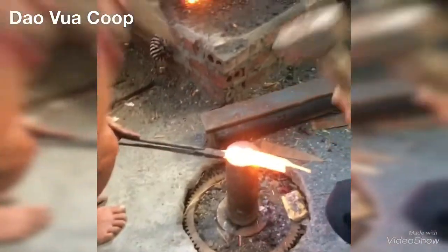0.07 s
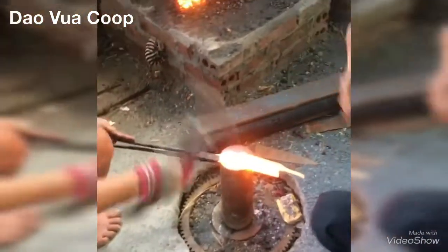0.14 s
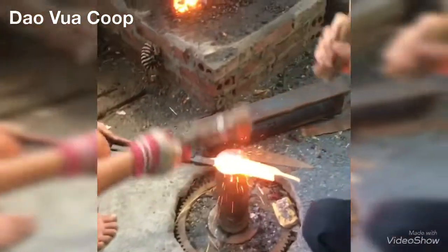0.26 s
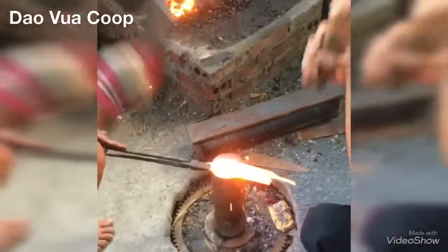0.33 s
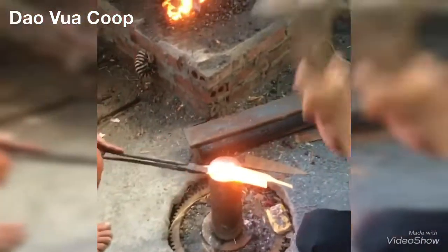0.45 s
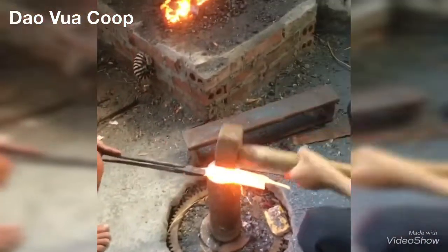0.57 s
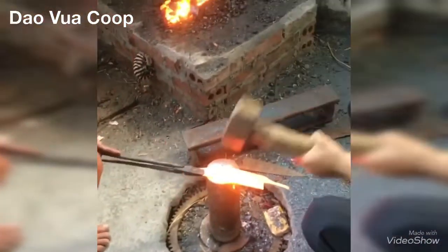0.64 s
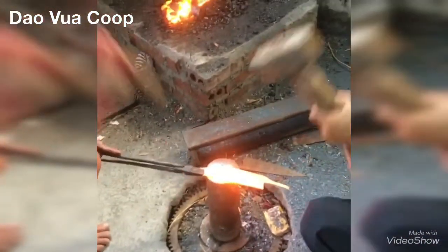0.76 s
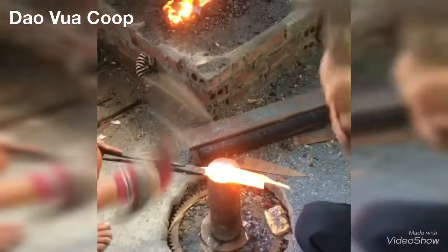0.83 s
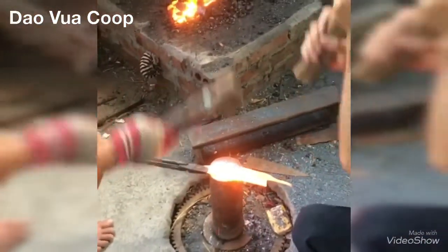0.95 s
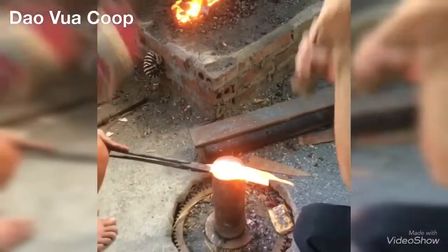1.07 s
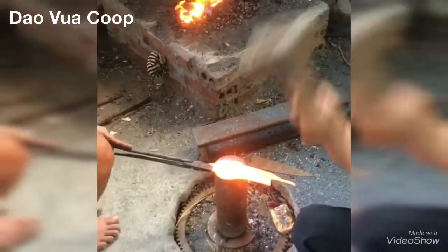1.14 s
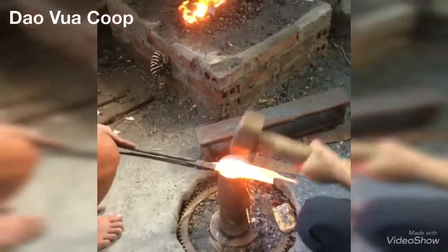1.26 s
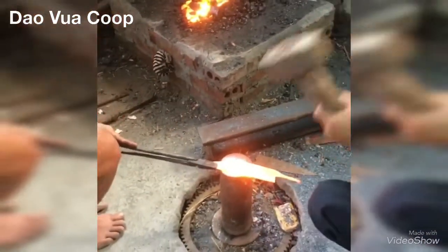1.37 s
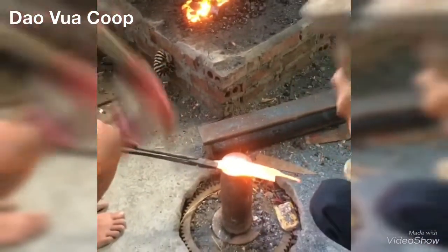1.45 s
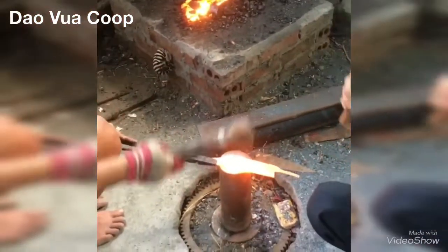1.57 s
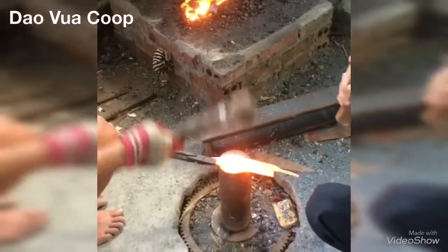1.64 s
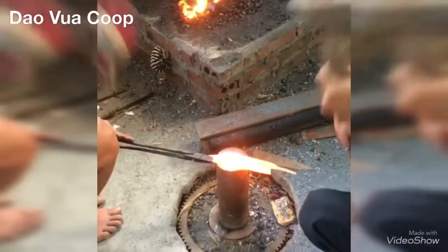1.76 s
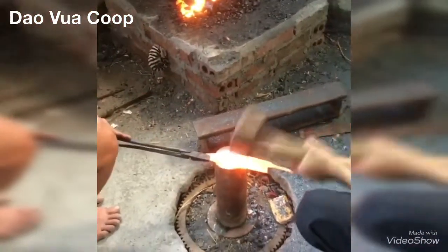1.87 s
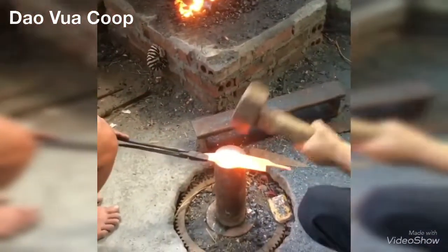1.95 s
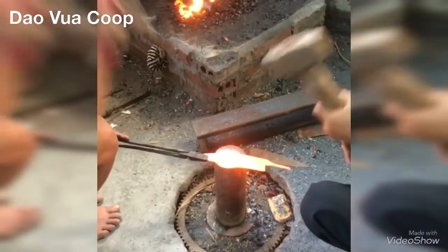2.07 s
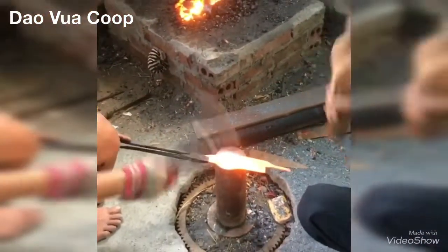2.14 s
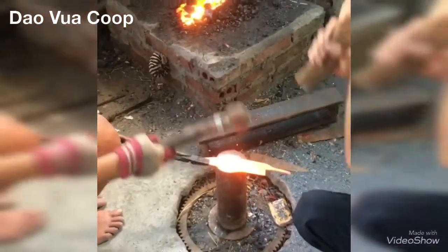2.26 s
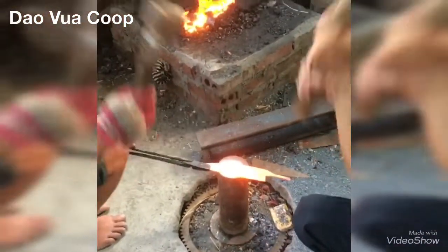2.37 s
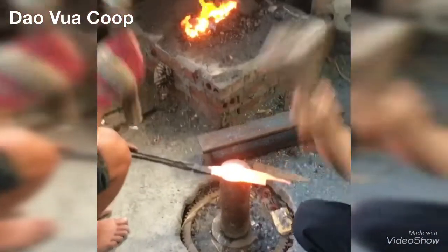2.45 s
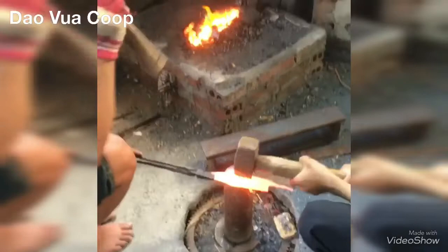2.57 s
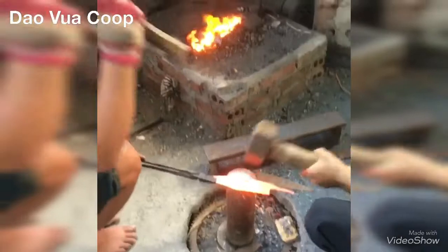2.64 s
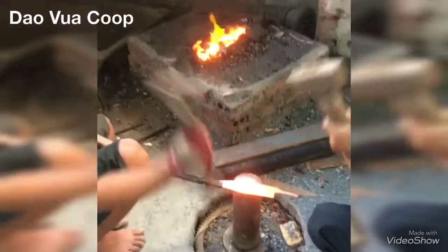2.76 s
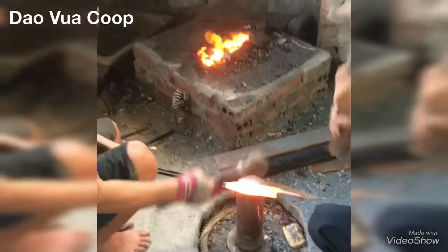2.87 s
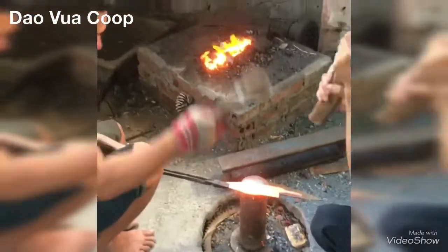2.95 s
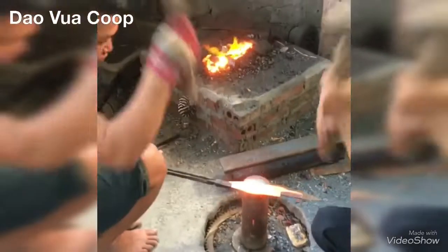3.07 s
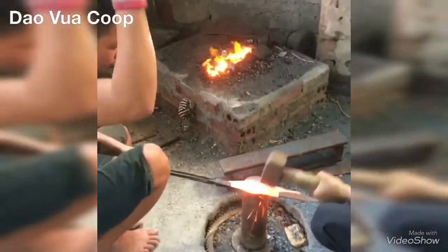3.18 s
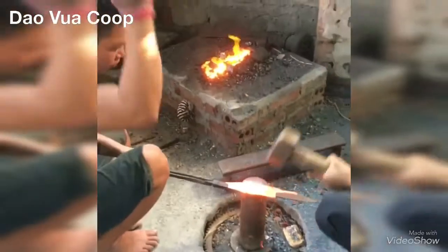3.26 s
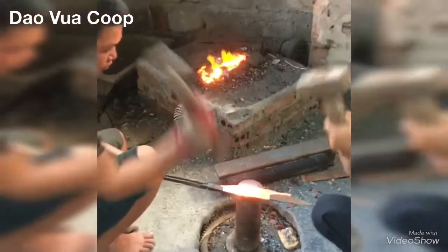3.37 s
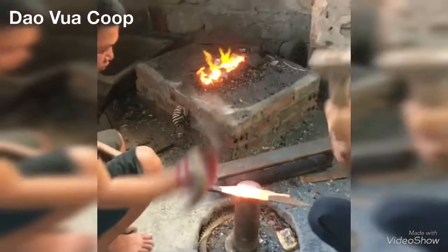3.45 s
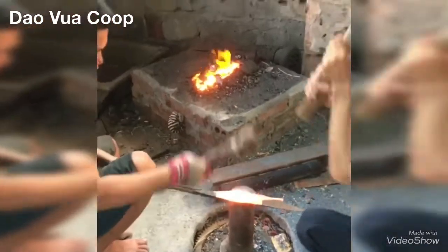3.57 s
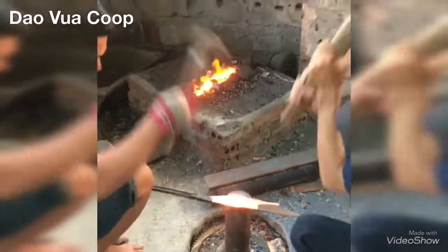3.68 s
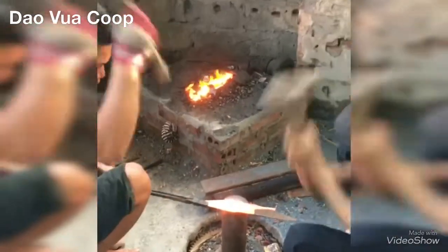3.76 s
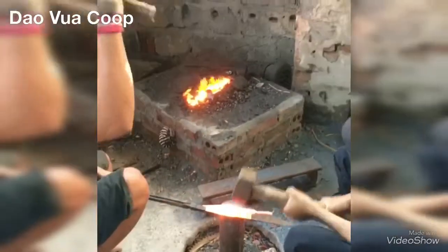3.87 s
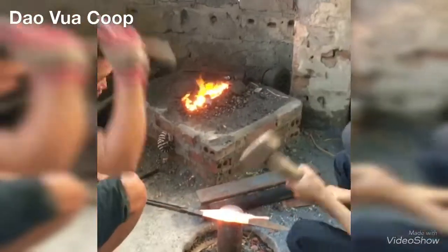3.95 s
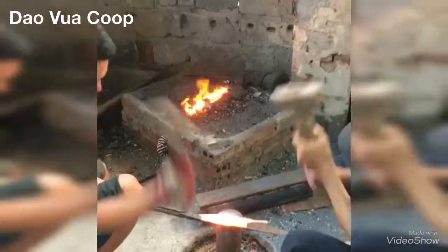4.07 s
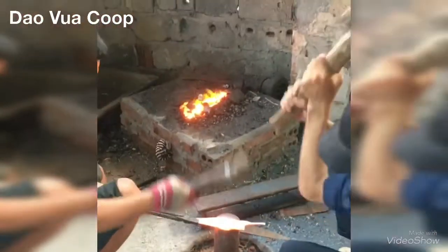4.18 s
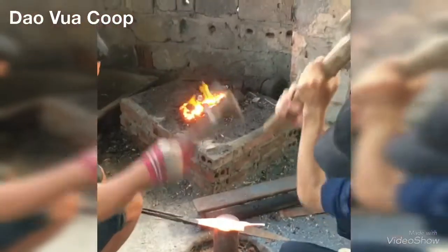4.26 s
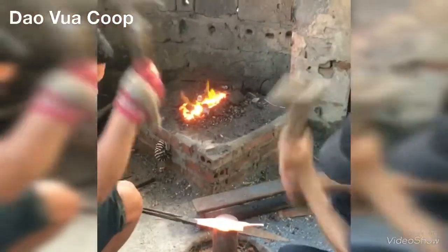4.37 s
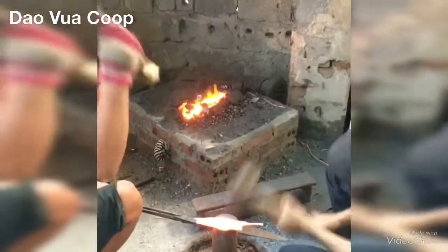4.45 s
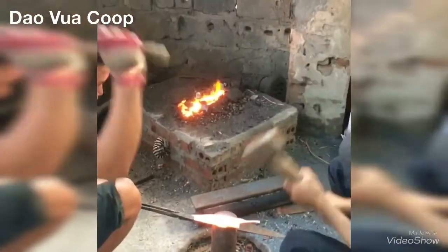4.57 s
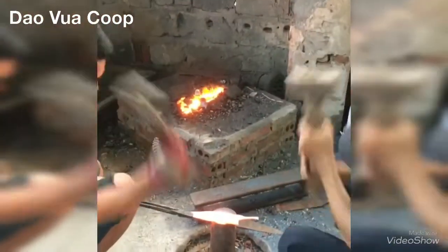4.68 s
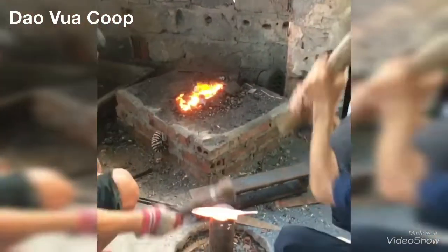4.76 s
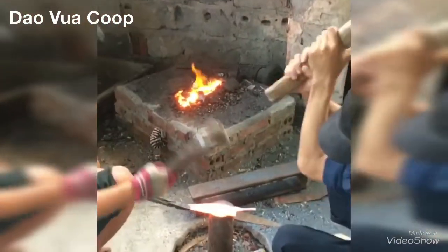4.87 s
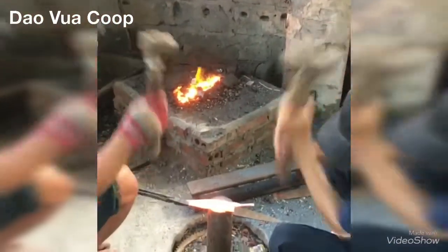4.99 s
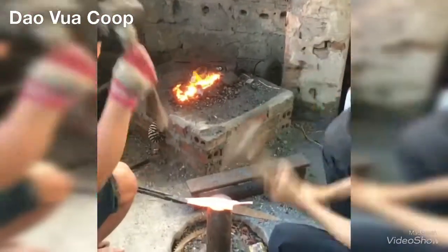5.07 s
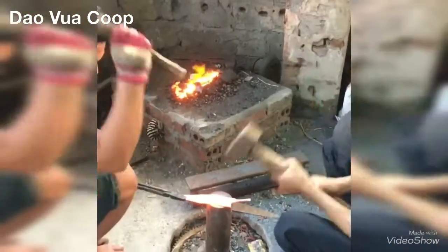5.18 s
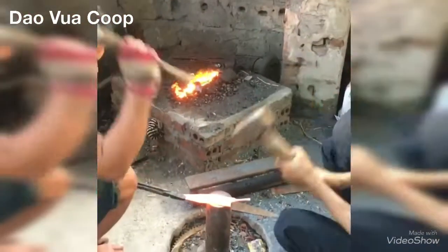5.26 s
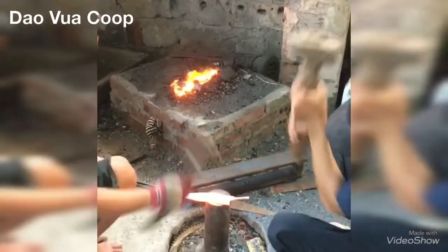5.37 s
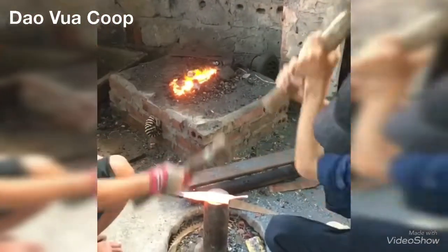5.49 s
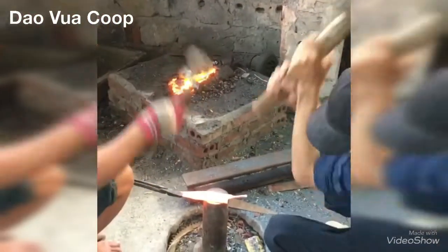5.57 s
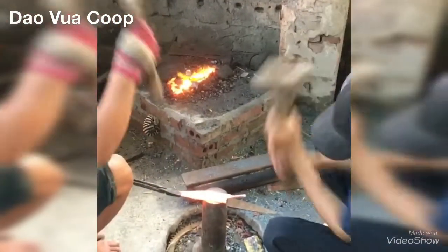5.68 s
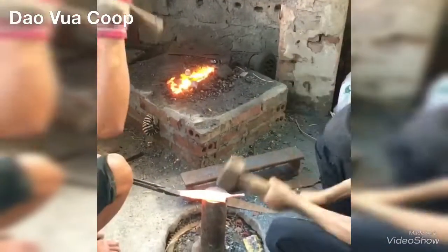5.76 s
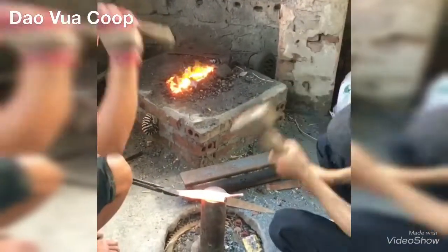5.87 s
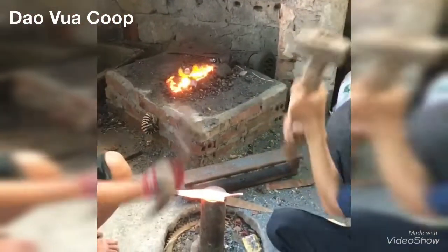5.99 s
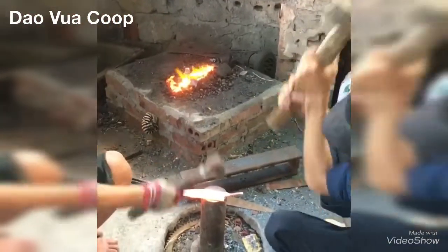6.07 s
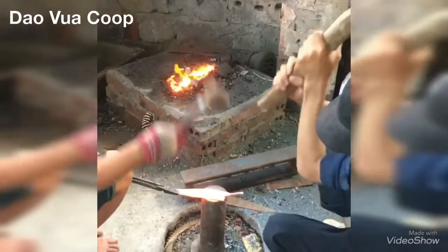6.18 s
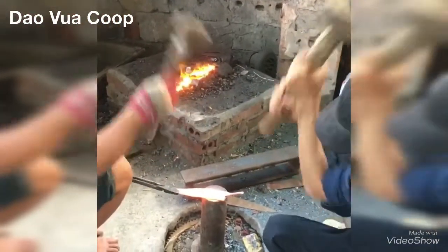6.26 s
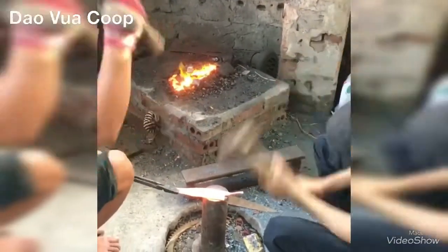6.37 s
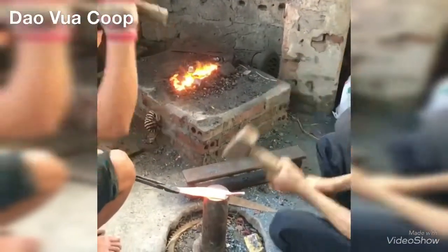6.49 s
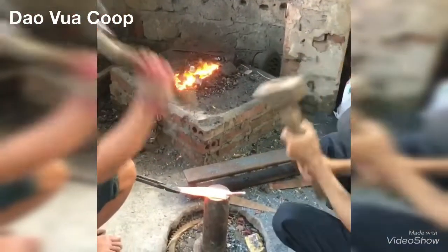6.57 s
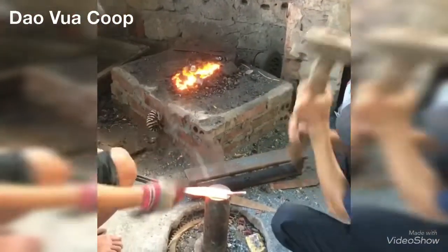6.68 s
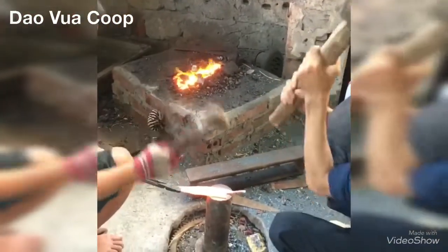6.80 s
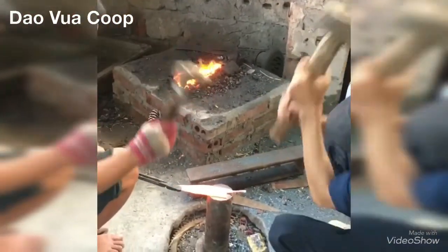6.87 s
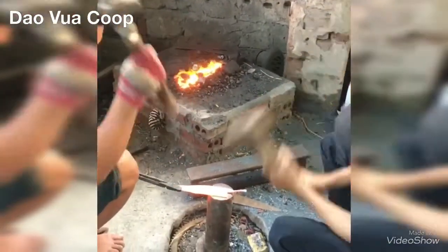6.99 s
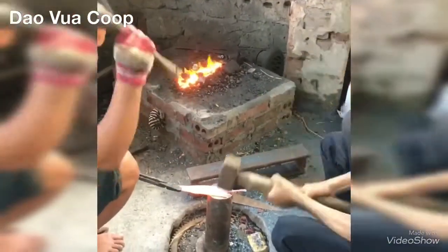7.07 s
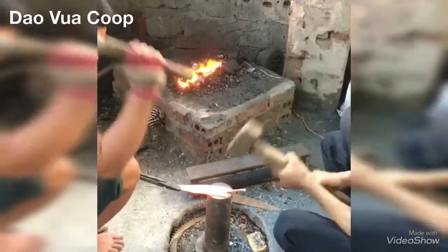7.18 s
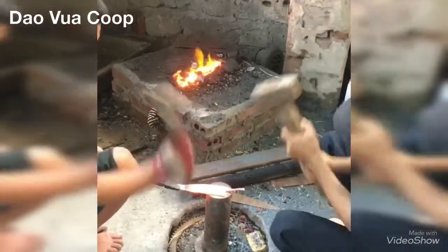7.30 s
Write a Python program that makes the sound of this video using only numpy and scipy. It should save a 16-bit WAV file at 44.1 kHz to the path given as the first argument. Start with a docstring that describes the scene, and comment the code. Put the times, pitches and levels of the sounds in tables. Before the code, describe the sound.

Steady forge hammering runs from start to end without a pause. Heavy and light hammers alternate evenly on a hot blade: deep metallic clank with a thud from the stump, then a crisp, treble-rich smack with less body. The ring is damped rather than bell-like, smeared by quick reflections from hearth, ground and wall. Very quiet hearth and air noise underneath; mono, near, loud and a little blunted.

```python
"""In an open forge with brick walls, two smiths take turns hammering a glowing blade on a small post anvil.
The heavy hammer lands with a low, clanging knock, the light one with a brighter smack.
Each blow is a sharp crack and shaped noise, dying away as a dense wash, over decaying sine waves for the low boom.
One dull bump and a faint rush of filtered noise lie underneath; the recorder rounds off the peaks."""
import sys
import numpy as np
from scipy import signal
from scipy.fft import rfft, irfft
from scipy.io import wavfile
from scipy.ndimage import uniform_filter1d

SR = 44100
rng = np.random.default_rng(int(sys.argv[2]) if len(sys.argv) > 2 else 0)


def waveform_to_disk(signal):
    """Save audio, clipped to [-1, 1], as 16-bit WAV at the path in sys.argv[1]."""
    frames = np.transpose(np.atleast_2d(signal))
    scaled = np.clip(frames, -1, 1) * 32767
    samples = np.round(scaled).astype(np.int16)
    wavfile.write(sys.argv[1], SR, samples)


N = 323253  # samples in the scene
LENGTH = 24576  # samples in one blow


def amp(db):
    """Turn decibels into a gain."""
    return 10 ** (np.asarray(db) / 20)


def unit(x):
    """Scale to an rms (average strength) of 1."""
    return x / np.sqrt(np.mean(x ** 2) + 1e-20)


def along(points, hz):
    """Read a curve of (f/Hz, value) points, with frequency on a log axis."""
    f, v = np.transpose(points)
    return np.interp(np.log(hz + 1), np.log(f + 1), v)


def add(track, s, sound):
    """Mix a sound into the track from time s on; a negative s cuts off its beginning."""
    start = round(s * SR)
    part = sound[max(-start, 0):N - start]
    track[max(start, 0):][:len(part)] += part


def ringing(modes, t, rise):
    """Each mode is a sine wave that swells within about `rise` seconds and then decays."""
    hz, db, t60 = np.transpose(modes)[:, :, None]
    sign = (-1) ** np.arange(len(modes))[:, None]  # neighbours start in opposite directions
    decay = amp(db - 60 * t / t60)
    swell = 1 - np.exp(-t / rise)
    return sign * decay * np.sin(2 * np.pi * hz * t) * swell


THINNING_S = 4  # time constant of the blade's thinning


def thickness(s):
    """1 for the fresh blade, falling towards 0 as it is beaten thin."""
    return np.exp(-max(s, 0) / THINNING_S)


# Damped resonances of anvil, blade and hammer heads, main ring first, knock second:
# [f/Hz, width/Hz, heavy hammer level/dB, light hammer level/dB, relative lengthening of the decay]
STEEL_RESONANCES = [(1699, 350, 11.5, 1, 0.13), (764, 123, 7.5, -4, 0.13), (1200, 97, -1.5, 2, 0.098),
                    (1318, 36, 5.5, 7, 0.098), (1505, 134, 3, 3, 0.062), (1940, 430, -1, 5.5, 0.054),
                    (2347, 234, 5.5, 5, 0.089), (2990, 420, 4, 2, 0.088), (4010, 270, 5.5, -0.5, 0.067),
                    (5160, 410, 6, -1.5, .02), (7074, 460, 8.5, 11, .02)]


def resonances(hz):
    """Each resonance of the steel is a bell-shaped row over frequency, with its peak at 1."""
    return np.array([1 / (1 + (2 * (hz - centre) / width) ** 2)
                     for centre, width, *_ in STEEL_RESONANCES])


# How alike the noise of one blow is to the next: [f/Hz, likeness from 0 to 1]
BLOW_LIKENESS = [(200, 0.86), (900, 0.81), (2100, 0.56), (5000, 0.26), (12000, 0.56)]
# How strongly the clank setting acts at each frequency: [f/Hz, multiplier]
CLANK_BY_FREQUENCY = [(1600, 0.1), (2400, 0.73), (5500, 1.24), (7200, 0.97), (10000, 0.19)]
KNOCK_SHARE = 0.49  # how far the knock follows the main ring's change in level


def impacts(blows, rings_db, colour, lifts, ripple_db):
    """The undamped clang: noise coloured by the steel, varying a little from blow to blow."""
    hz = np.fft.rfftfreq(LENGTH, 1 / SR)
    bells = resonances(hz)
    # a crowd of small modes between the big ones
    partials = unit(uniform_filter1d(rng.standard_normal(len(hz)), size=18))
    ripple = ripple_db * partials * hz / (hz + 1000)
    body = unit(amp(along(colour, hz) + lifts @ bells + ripple))
    alike = along(BLOW_LIKENESS, hz)
    paths = rfft(rng.standard_normal(LENGTH))
    spectra = []
    for (_, _, clank_db), ring_db in zip(blows, rings_db):
        # long waves take nearly the same paths every time, short ones less so
        fresh = rfft(rng.standard_normal(LENGTH))
        paths = alike * paths + np.sqrt(1 - alike ** 2) * fresh
        clank = clank_db * along(CLANK_BY_FREQUENCY, hz)
        ring = ring_db * (bells[0] + KNOCK_SHARE * bells[1])
        spectra.append(paths * body * amp(clank + ring))
    return irfft(np.array(spectra))


# Early decay, before the settings `length` and `linger` stretch it: [f/Hz, time to fall 60 dB t60/s]
EARLY_DECAY = [(100, 0.52), (600, 0.33), (1200, 0.36), (3500, 0.33), (7000, 0.27), (10000, 0.29),
               (15000, 0.22)]
# Decay of the far echoes: [f/Hz, time to fall 60 dB t60/s]
FAR_ECHO_DECAY = [(100, 1.56), (1700, 1.2), (4000, 0.84), (7000, 0.87), (14000, 0.34)]


def die_away(wash, hold, soft_hz, length, linger, late_db):
    """Near walls hold the level briefly; then it falls, slower at the resonances, into far echoes."""
    hz, t, z = signal.stft(wash, SR, nperseg=512)
    lengthening = np.array(STEEL_RESONANCES)[:, 4] @ resonances(hz)
    t60 = length * along(EARLY_DECAY, hz) * (1 + linger * lengthening)
    held = hold / (1 + (hz / soft_hz) ** 2)  # rough brick returns little of the top treble
    early = amp(-60 * np.maximum(t - held[:, None], 0) / t60[:, None])
    late = amp(late_db - 60 * t / along(FAR_ECHO_DECAY, hz)[:, None])
    return signal.istft(z * np.hypot(early, late), SR, nperseg=512)[1][:, :LENGTH]


# The crack and its first echoes off ground, hearth and wall: [delay t/s, relative gain]
CRACK_ECHOES = [(0, 1.25), (.0062, .45), (.0085, .5), (0.0198, 0.58)]
# Low modes of stump, ground and walls: [f/Hz, relative level/dB, time to fall 60 dB t60/s]
LOW_MODES = [(47.6, -50.5, 0.81), (58, -32, .4), (76, -58, 0.52), (119.5, -28, 0.29), (133, -35, 1),
             (154.1, -25.5, 0.42), (178.9, -25.5, 0.34), (192.2, -32.5, 0.55), (225, -37.5, 0.5),
             (241, -37, 0.41), (276.6, -25.5, 0.47), (291.4, -15.5, 0.14), (345.5, -33, 0.49),
             (377.7, -34.5, 0.39), (408, -38, 0.35), (450, -35.5, 0.31)]
# Short thud of the stump under the anvil: [f/Hz, relative level/dB, time to fall 60 dB t60/s]
STUMP_THUD = [(55, -32, 0.18), (177, -22, 0.11), (286.5, -16, 0.055)]
# The microphone drifts through standing waves, tilting the low modes: [t/s, tilt/(dB per octave)]
MICROPHONE_DRIFT = [(0, 2.5), (2.7, 4), (3.2, -1), (7.3, -1)]
PIVOT_HZ = 214  # the tilt turns about this frequency
KNOCK_DB = -6.5  # the knock's clear tone against the main ring's


def hammer(blows, colour, lifts, wash_db, boom_db, thud_db, snap_db, tone_db, thick_db, thin_db,
           crack, build, scatter_db, **decay):
    """Each blow is a crack and a quickly swelling wash of reflections, over the stump's thud and the low modes."""
    track = np.zeros(N)
    t = np.arange(LENGTH) / SR
    cracks = sum(gain * (t >= delay) * np.exp(-abs(t - delay) / 0.0018) for delay, gain in CRACK_ECHOES)
    attack = crack * cracks + 1 - np.exp(-t / build)
    # the main ring changes level as the blade thins
    rings_db = [thin_db + (thick_db - thin_db) * thickness(s) for s, *_ in blows]
    clangs = impacts(blows, rings_db, colour, lifts, ripple_db=2.0)
    washes = attack * die_away(clangs, **decay)
    boom = ringing(LOW_MODES, t, rise=0.0044)
    thud = ringing(STUMP_THUD, t, rise=0.0026).sum(0)
    octaves = np.clip(np.log2(np.array(LOW_MODES)[:, 0] / PIVOT_HZ), -1, 1)
    # ring and knock, heard directly
    main_ring = (STEEL_RESONANCES[0][0], tone_db, .45)
    knock = (STEEL_RESONANCES[1][0], tone_db + KNOCK_DB, .38)
    tone = ringing([main_ring, knock], t, rise=0.00039).sum(0)
    for (s, db, _), ring_db, wash in zip(blows, rings_db, washes):
        tilt_db = np.interp(s, *np.transpose(MICROPHONE_DRIFT)) * octaves
        mode_scatter_db = scatter_db * rng.standard_normal(len(LOW_MODES))
        low = amp(boom_db + tilt_db + mode_scatter_db) @ boom + amp(thud_db) * thud
        # brittle scale shatters on contact; differencing the noise brightens it
        snap = amp(snap_db) * cracks * np.diff(rng.standard_normal(LENGTH + 1))
        blow = amp(wash_db) * wash + low + amp(ring_db) * tone + snap
        add(track, s, amp(db) * blow)
    return track


# Blows of the sledge; clank is how hard a blow reaches the anvil through the soft blade:
# [t/s, relative level/dB, clank level/dB]
HEAVY_BLOWS = [(-0.075, -4, -8.5), (0.6093, 0.2, -8), (1.2778, -1.74, -1), (1.9305, -2.5, -2),
               (2.5855, -1.2, -3), (3.2398, -0.5, -1), (3.8931, 0, 0), (4.5436, -0.85, 1),
               (5.1895, -0.8, 0.6), (5.8378, -1.2, 2.3), (6.4901, -1.5, 2), (7.1368, -1, -2)]
# Broad colour of the sledge's impact: [f/Hz, relative level/dB per Hz]
HEAVY_IMPACT_COLOUR = [(30, -5), (120, -15), (300, -1), (500, -5.5), (680, -4.5), (1000, -2.5),
                       (2100, -4.5), (3300, -3.5), (4300, -6.5), (4850, -15.5), (5800, -8), (8000, -14.5),
                       (10600, -18), (15000, -18.5)]


def heavy_hammer():
    """The striker's sledge drives the steel's low resonances hard."""
    return hammer(HEAVY_BLOWS, HEAVY_IMPACT_COLOUR, np.array(STEEL_RESONANCES)[:, 2],
                  wash_db=-13.5, boom_db=0.0, thud_db=3.0, snap_db=-25.5, tone_db=-23.5,
                  thick_db=1.0, thin_db=-2.5, crack=1.68, build=0.0053, scatter_db=1.1,  # build in s
                  hold=0.024, soft_hz=6950, length=0.9, linger=0.69, late_db=-20.5)  # hold in s


# Colour of the faint rush: [f/Hz, relative level/dB per Hz]
AIR_COLOUR = [(25, -11), (76, -10), (200, -10), (350, -13.5), (660, -19.5), (2160, -14), (5400, -28.5),
              (7100, -32), (9000, -35.5), (16000, -47)]


def air(level_db):
    """The hearth and the open air make a faint steady rush, built from filtered noise."""
    hz = np.fft.rfftfreq(N, 1 / SR)
    spectrum = rfft(rng.standard_normal(N)) * amp(along(AIR_COLOUR, hz))
    return amp(level_db) * unit(irfft(spectrum, N))


# Blows of the hand hammer; clank is how hard a blow reaches the anvil through the soft blade:
# [t/s, relative level/dB, clank level/dB]
LIGHT_BLOWS = [(0.2377, 0.91, -1.1), (0.9152, 0.13, -0.16), (1.5886, -0.94, 0.15),
               (2.2336, -0.0077, -0.076), (2.889, 0.69, -0.68), (3.5302, 0.65, 0.098), (4.1818, -0.5, 0.08),
               (4.8325, -1, 1), (5.4881, 0, -0.47), (6.1306, -0.73, 0), (6.7785, -0.11, -0.21)]
# Broad colour of the hand hammer's impact: [f/Hz, relative level/dB per Hz]
LIGHT_IMPACT_COLOUR = [(30, -17), (120, -24), (300, -7), (500, -10.5), (700, -7.5), (1000, -2.5),
                       (2100, -4.5), (3300, -3.5), (4300, -4), (4850, -7.5), (5800, -2.5), (8000, -8.5),
                       (10600, -15.5), (15000, -17)]


def light_hammer():
    """The smith's hand hammer makes a shorter contact, so more treble and less boom."""
    return hammer(LIGHT_BLOWS, LIGHT_IMPACT_COLOUR, np.array(STEEL_RESONANCES)[:, 3],
                  wash_db=-14.5, boom_db=-8, thud_db=-3.5, snap_db=-31, tone_db=-45,
                  thick_db=1.3, thin_db=1.5, crack=1.17, build=0.004, scatter_db=0.3,  # build in s
                  hold=0.015, soft_hz=8850, length=0.98, linger=.14, late_db=-23.5)  # hold in s


# One loose, dull bump under a light blow: [f/Hz, level/dB, time to fall 60 dB t60/s]
BUMP_MODE = [(76, -16, 0.043)]
BUMP_TIME_S = 4.834


def bump():
    """A single deep sine wave, quickly damped, makes a bump."""
    track = np.zeros(N)
    t = np.arange(LENGTH) / SR
    add(track, BUMP_TIME_S, ringing(BUMP_MODE, t, rise=0.0012)[0])
    return track


def scene():
    """Both hammers and the bump sound over the quiet of the forge, in one channel."""
    return (heavy_hammer() + light_hammer() + bump() + air(level_db=-50.5))[None]


TOP_HZ = 15900  # upper band limit of the recorder


def record(dry, ceiling=0.43):
    """The recorder rounds off the highest peaks and steeply cuts what lies above its band limit."""
    rounded = dry / (1 + (dry / ceiling) ** 4) ** (1 / 4)
    # order 10, 0.1 dB ripple in the band, 80 dB down beyond it
    band_limit = signal.ellip(10, .1, 80, TOP_HZ, fs=SR, output="sos")
    return signal.sosfilt(band_limit, rounded)


dry = scene()
out = record(dry)
waveform_to_disk(out)
```